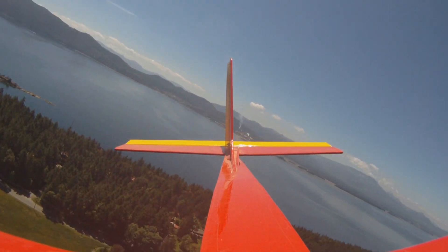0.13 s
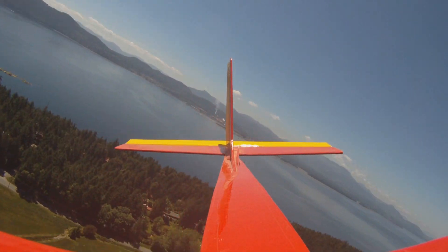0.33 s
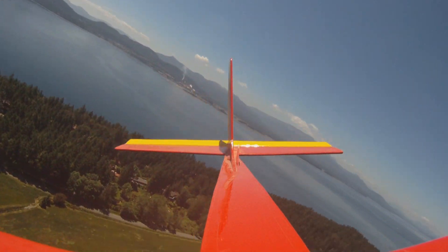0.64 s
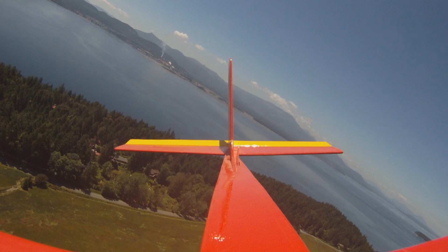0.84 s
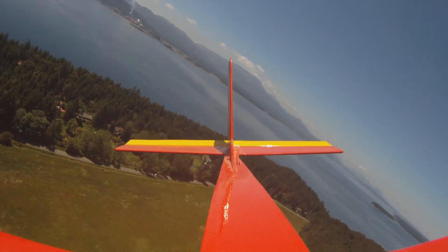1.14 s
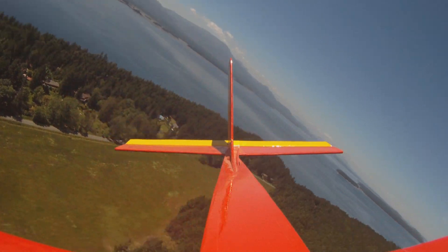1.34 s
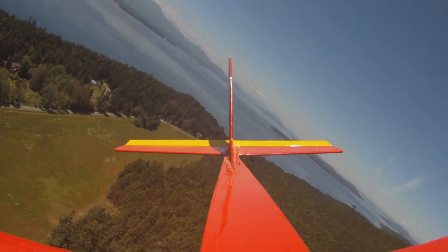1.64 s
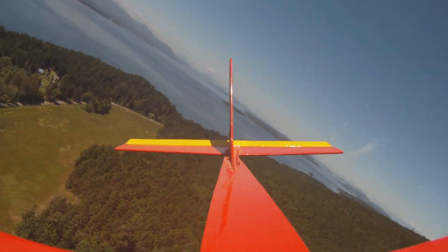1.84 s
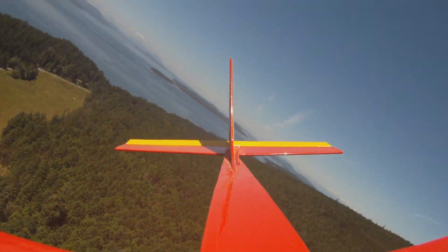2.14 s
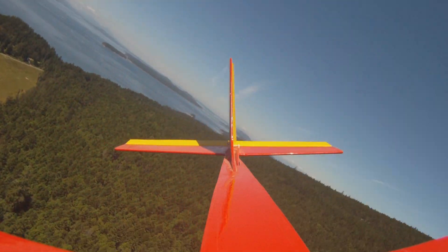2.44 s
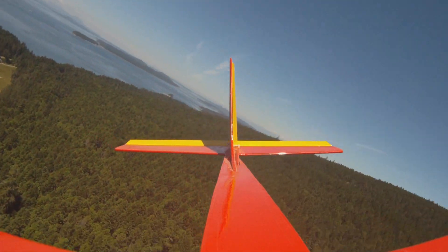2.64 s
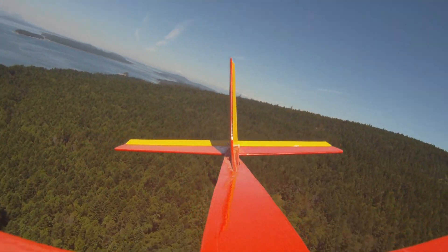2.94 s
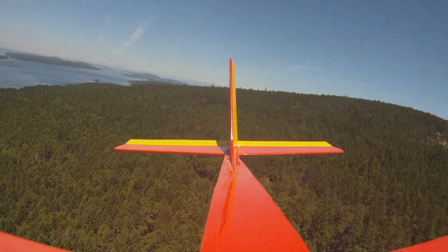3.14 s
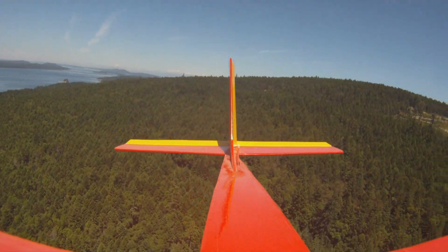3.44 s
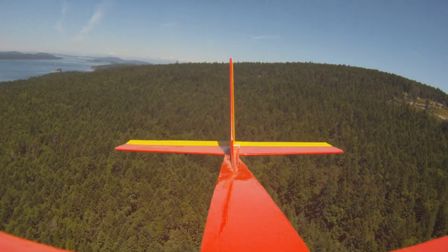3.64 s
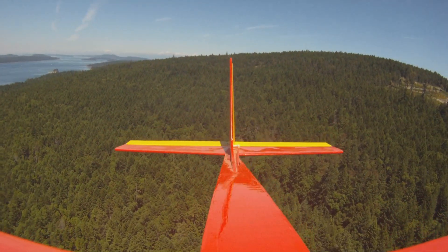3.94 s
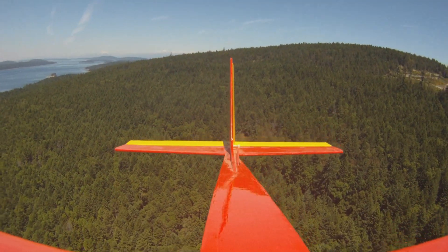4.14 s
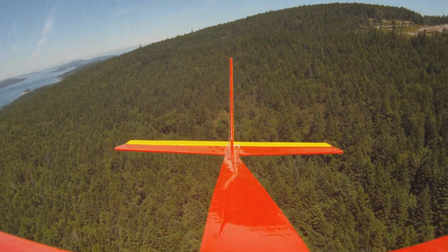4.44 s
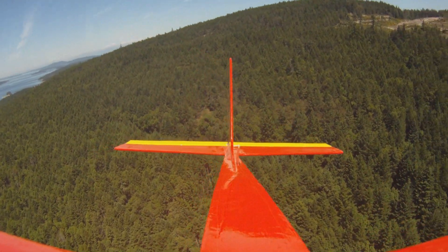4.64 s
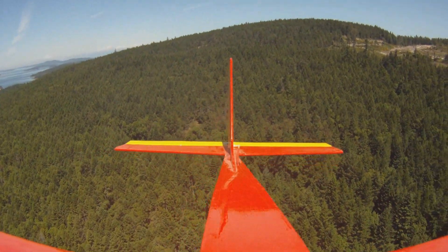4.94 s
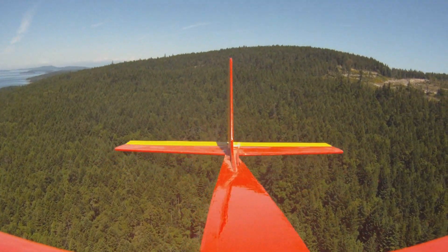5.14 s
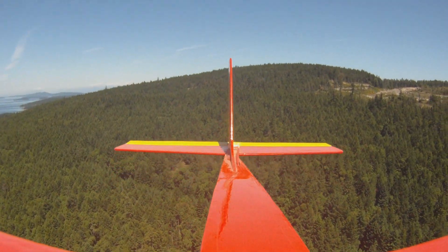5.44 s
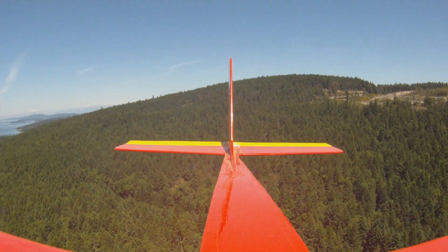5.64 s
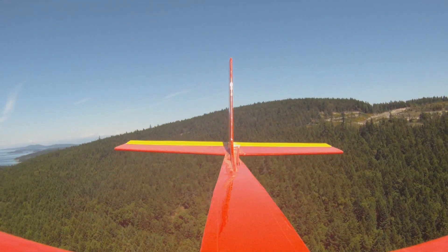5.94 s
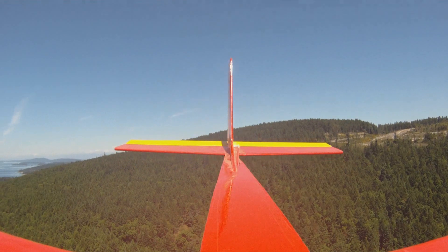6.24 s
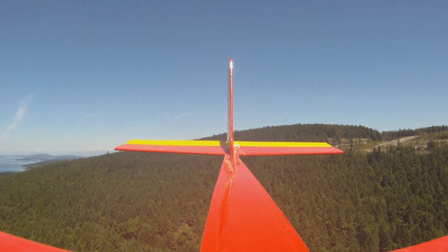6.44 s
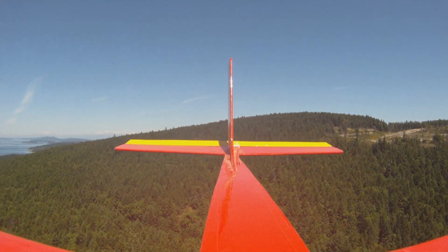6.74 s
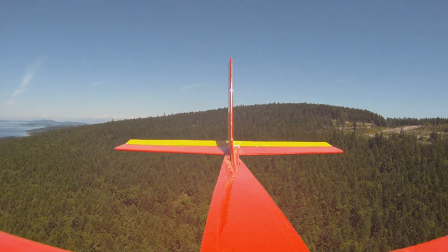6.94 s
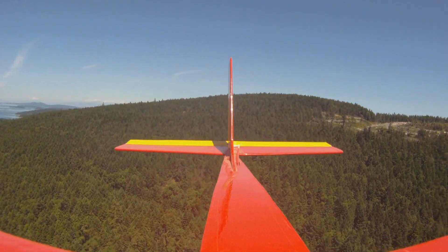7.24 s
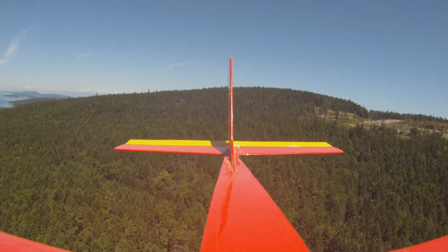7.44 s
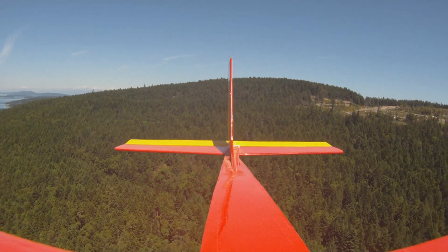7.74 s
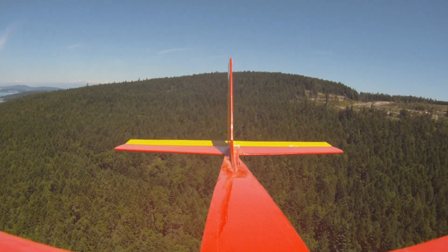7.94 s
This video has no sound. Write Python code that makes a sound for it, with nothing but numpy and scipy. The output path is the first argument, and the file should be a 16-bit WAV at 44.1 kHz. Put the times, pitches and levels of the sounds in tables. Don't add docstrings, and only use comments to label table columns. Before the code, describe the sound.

Wind rumbles low against a microphone on a gliding model aircraft while its small servos buzz, knock and grind in restless short bursts.

```python
import sys
import numpy as np
from scipy import signal
from scipy.io import wavfile

SR = 44100
rng = np.random.default_rng(int(sys.argv[2]) if len(sys.argv) > 2 else 0)


def invert_db(level):
    return 10 ** (np.asarray(level, dtype=float) / 20)


def wav_out(sig):
    wavfile.write(sys.argv[1], SR, np.round(np.clip(np.atleast_2d(sig).T, -1, 1) * 32767).astype(np.int16))


N = 356769
CONTROL_T = np.arange(0, N, 64) / SR


def rms_one(x):
    return x / np.sqrt(np.mean(x ** 2) + 1e-20)


def full_rate(curve):
    return np.interp(np.arange(N) / SR, CONTROL_T, curve)


def in_time(rows):
    s, *columns = np.transpose(rows)
    return [np.interp(np.arange(N) / SR, s, column) for column in columns]


def drift(rate_hz):
    r = np.exp(-2 * np.pi * rate_hz / SR)
    white = rng.standard_normal(N + SR)
    return rms_one(signal.lfilter([1], [1, -2 * r, r * r], white)[SR:])


def decay(x, time_s):
    return signal.lfilter([1], [1, -np.exp(-1 / (time_s * SR))], x)


def bandpass(order, low_hz, high_hz):
    return signal.butter(order, [low_hz, high_hz], "band", fs=SR, output="sos")


def double_resonance(x, hz, width_hz):
    r = np.exp(-np.pi * width_hz / SR)
    top = [(1 - r * r) / 2, 0, (r * r - 1) / 2]
    bottom = [1, -2 * r * np.cos(2 * np.pi * hz / SR), r * r]
    once = signal.lfilter(top, bottom, x + 1e-18)
    return signal.lfilter(top, bottom, once + 1e-18)


def clicks(times, sizes):
    out = np.zeros(N)
    places = np.clip((np.asarray(times) * SR).astype(int), 0, N - 1)
    np.add.at(out, places, sizes)
    return out


def self_noise():
    return invert_db(-72) * rng.standard_normal(N)


# t/s, hiss level/dB, eddy shedding f/Hz
AIR_STREAM = [(0, -53.5, 56), (0.72, -54.5, 54.7), (0.95, -51.5, 64.43), (1.5, -53, 57), (1.8, -54, 62.3),
              (2, -52.5, 57.6), (2.35, -56.5, 70.1), (2.93, -49.5, 68), (3.4, -56.5, 61.9),
              (4.3, -54, 67.44), (4.9, -58, 61.3), (5.05, -60, 46.3), (5.4, -63.5, 46.5),
              (5.65, -58.5, 63.6), (6.1, -61.5, 71.5), (6.6, -58, 53), (7.25, -53.5, 67), (8.09, -56.5, 60)]
# f/Hz, level per Hz/dB
HISS_COLOUR = [(110, -14), (150, 0), (220, -6), (300, -11.5), (450, -16.5), (700, -15.5), (1000, -7.5),
               (1500, -19.5), (2500, -31), (4000, -35), (5900, -53)]
# f/Hz, width/Hz, level against the hiss/dB
HOUSING_MODES = [
    (30.4, 26, 0),
    (87.6, 17, 7),
    (112.3, 30.6, -1.5),
    (175.3, 42, -7.5),
    (196.3, 15.2, -8.5),
    (224.8, 22, -15),
    (257.3, 8.8, -19),
    (349.1, 7.9, -19.5),
    (920, 10, -11),
    (1142, 130, -17),
]


def stream():
    together = drift(4.0)
    edges = 125 * 2 ** np.arange(0, 5.6, .33)
    white = rng.standard_normal((2, N))
    colour_hz, colour_level = np.transpose(HISS_COLOUR)
    hiss = 0
    for k, (low, high) in enumerate(zip(edges, edges[1:])):
        band = signal.sosfilt(bandpass(2, low, high), white[k % 2])
        colour_db = np.interp(np.log(low * high) / 2, np.log(colour_hz), colour_level)
        hiss = hiss + band * invert_db(colour_db + 2.3 * together + 2.2 * drift(13))
    push = rng.standard_normal(N)
    hum = 0
    for k, (hz, width_hz, db) in enumerate(HOUSING_MODES):
        hum = hum + (-1) ** k * invert_db(db) * rms_one(double_resonance(push, hz, width_hz))
    air_db = in_time(AIR_STREAM)[0]
    return invert_db(air_db + 2.0) * (rms_one(hiss) + hum)


# t/s, half length/s, swing level/dB
EDDIES = [(0.356, 0.009, 12), (0.605, 0.017, 10), (0.727, 0.047, 6.5), (0.9, 0.054, -9.5),
          (1.225, 0.11, -4), (1.548, 0.054, 8.5), (1.686, 0.026, -3.5), (1.731, 0.023, 9.5),
          (1.823, 0.011, 8), (2.09, 0.012, 13), (2.152, 0.019, -18), (2.453, 0.18, -3), (2.901, 0.019, 11),
          (2.938, 0.16, -3.8), (3.077, 0.018, 6), (3.173, 0.066, 7), (3.373, 0.011, 12),
          (3.455, 0.016, -12.0), (4.197, 0.013, 3), (4.559, 0.11, 2), (4.77, 0.026, 3), (5.445, 0.1, -1.5),
          (5.717, 0.035, 6.5), (5.942, 0.1, -3.5), (6.181, 0.045, 8), (6.592, 0.024, 6.9),
          (6.988, 0.017, -22), (7.533, 0.047, -12.5), (7.769, 0.02, -13), (7.854, 0.016, -17)]


def eddy_swing():
    swing_db = 0
    for s, half_s, db in EDDIES:
        swing_db = swing_db + db * np.exp(-.5 * ((CONTROL_T - s) / half_s) ** 2)
    return full_rate(swing_db)


def buffet():
    air_db, shedding_hz = in_time(AIR_STREAM)
    level_db = air_db + 19.5 + eddy_swing()
    smooth = signal.butter(2, 23.0, fs=SR, output="sos")
    white = rng.standard_normal(N + SR) + 1j * rng.standard_normal(N + SR)
    wander = signal.sosfilt(smooth, white)[SR:]
    size = rms_one(np.abs(wander)) ** .7
    turning = np.angle(wander) + 2 * np.pi * np.cumsum(shedding_hz) / SR
    swing = invert_db(level_db) * size * np.cos(turning)
    return invert_db(5.0) * signal.sosfiltfilt(bandpass(2, 38, 100), swing)


# t/s, peak level/dB
CREAKS = [(0.1027, -63), (0.154, -59.5), (0.167, -62), (0.4688, -58), (0.5926, -57), (0.9098, -62),
          (0.9532, -59), (0.9732, -64), (0.9877, -63), (1.0111, -61), (1.0221, -56), (1.045, -65),
          (1.1772, -65), (1.2062, -61), (1.2391, -61), (1.2524, -62), (1.265, -53), (1.2895, -61),
          (1.3229, -68), (3.3682, -61), (3.6731, -64), (4.2657, -52)]


def ticks():
    hits = None
    s, peak_db = np.transpose(CREAKS)
    hits = clicks(s, invert_db(peak_db))
    noise = decay(hits, 0.00091) * rng.choice([-1, 1], N)
    creak = 0.45 * noise + 1.95 * hits
    return invert_db(24.5) * double_resonance(creak, 5200, 1800)


# f/Hz, width/Hz, level/dB
AIRFRAME_MODES = [(550, 730, -22), (926.4, 116, -1.5), (1183, 210, -9), (2006, 369, -6),
                  (2335, 198.5, -2.5), (2684, 312, -18), (3300, 220, -32), (3547, 160, -22.5),
                  (3776, 353, -19.5), (3857, 250, -20), (4030, 260, -36), (4930, 940, -42.5)]


def airframe(push, low_db, high_db):
    out = 0
    for k, (hz, width_hz, db) in enumerate(AIRFRAME_MODES):
        drive_db = low_db if hz < 1500 else high_db if hz > 3000 else 0
        out = out + (-1) ** k * invert_db(db + drive_db) * double_resonance(push, hz, width_hz)
    return out


# t/s, peak level/dB
JOLTS = [(0.597, -33), (0.6245, -34.5), (0.6521, -30), (0.6953, -28.5), (0.7751, -33), (0.8101, -26.5),
         (0.8664, -28), (1.0944, -22.5), (1.3857, -32.5), (1.736, -24.5), (2.4628, -29), (2.6485, -30),
         (2.7033, -29), (2.8325, -32.5), (2.8754, -34), (2.9432, -31), (3.1073, -28.5), (4.4004, -25.5),
         (5.0569, -30), (5.1292, -35), (5.1552, -33.5), (5.2689, -43.5), (5.3398, -47), (5.4261, -27.5),
         (5.7219, -32.5), (6.3949, -28), (6.7321, -34), (6.8214, -29.5), (6.8548, -32.5), (7.6066, -21)]


def jolts():
    s, peak_db = np.transpose(JOLTS)
    hits = clicks(s, invert_db(peak_db))
    chatter = decay(hits, 0.0011) * rng.standard_normal(N)
    gain_db = 35.5
    return invert_db(gain_db) * airframe(hits + .1 * chatter, low_db=-9.0, high_db=-6.0)


# start t/s, length/s, depth level/dB
RESTS = [(0.1, 0.03, -2), (0.368, 0.053, -15), (1.492, 0.19, -9.5), (2.429, .02, -19), (3.153, 0.096, -7),
         (3.646, 0.018, -15), (3.915, 0.025, -26), (4.011, 0.1, -33), (4.26, 0.03, -4), (4.357, 0.057, -24),
         (4.537, 0.041, -14), (5.117, 0.023, -24), (5.173, .06, -5.5), (5.235, 0.18, -25),
         (6.015, 0.048, -20), (6.189, .16, -15), (6.702, 0.024, -10), (7.338, .03, -11), (7.621, .02, -12)]


def idling():
    edge_s, drop_db = 0.0038, 0
    for s, length_s, db in RESTS:
        inside_s = np.minimum(CONTROL_T - s, s + length_s - CONTROL_T)
        drop_db = drop_db + db * np.clip(inside_s / edge_s + .5, 0, 1)
    return drop_db


# start t/s, length/s, grinding level/dB
MOVES = [(0.0, 0.081, -41), (0.165, 0.15, -42.5), (0.453, 0.07, -46.3), (0.616, 0.12, -46.5),
         (0.84, 0.071, -41.5), (1.1, 0.055, -44.5), (1.282, 0.011, -47), (1.739, 0.056, -43.5),
         (1.892, 0.04, -73), (2.044, 0.19, -44), (2.292, 0.13, -46), (2.487, 0.12, -43.5),
         (2.695, 0.14, -54), (3.324, 0.027, -50), (3.431, 0.0044, -55.5), (3.583, 0.046, -47.5),
         (3.697, 0.09, -41.5), (3.835, 0.054, -44), (4.094, 0.14, -48), (4.396, 0.11, -48.5),
         (4.631, 0.194, -49.5), (4.848, 0.081, -38), (5.026, 0.14, -51.5), (5.413, 0.12, -50),
         (5.632, 0.06, -53), (6.426, 0.1, -37.5), (6.632, 0.033, -50.5), (6.737, 0.19, -50),
         (7.421, 0.063, -46), (7.534, 0.087, -48.5)]


def arm_travel():
    spin_up, run_down = 428, 345
    power = 0
    for s, length_s, db in MOVES:
        early_s = np.maximum(s - CONTROL_T, 0)
        late_s = np.maximum(CONTROL_T - s - length_s, 0)
        power = power + invert_db(db - spin_up * early_s - run_down * late_s) ** 2
    return power


def servo_work():
    air_db = np.interp(CONTROL_T, *np.transpose(AIR_STREAM)[:2])
    idle_db, travel = idling(), arm_travel()
    load_db = 1.64 * drift(11.45)[::64]
    hold = invert_db(-51 + 0.29 * (air_db + 51) + idle_db + load_db)
    creep_db = -59 + 0.77 * (air_db + 55) + 0.72 * idle_db
    creep = invert_db(creep_db + 1.9 * drift(24.0)[::64])
    knock = np.sqrt(hold ** 2 + invert_db(-8) ** 2 * travel)
    grind = np.sqrt(travel + creep ** 2)
    return full_rate(knock), full_rate(grind)


def pulse_kicks():
    first_s, frame_hz = .0108, 70.18
    pulses = np.arange(first_s, N / SR, 1 / frame_hz)
    luck = np.clip(rng.standard_normal((len(pulses), 2)), -2, 2)
    knocks = clicks(pulses + .0002 * luck[:, 0], invert_db(1.9 * luck[:, 1]))
    rattle = rng.choice([-1, 1], N) * decay(knocks, 0.0019)
    kick = rms_one(airframe(.7 * rms_one(rattle) + rms_one(knocks), low_db=-4.0, high_db=-1.0))
    return kick + invert_db(-2.0) * double_resonance(kick, 2780, 300)


def gear_grind():
    force_db = 6.3 * np.minimum(rng.exponential(1, N), 3)
    meets = rng.random(N) < 6000 / SR
    teeth = rng.choice([-1, 1], N) * invert_db(force_db) * meets
    return rms_one(airframe(teeth * invert_db(1.95 * drift(43)), low_db=-3.5, high_db=3.0))


def servos():
    knock_size, grind_size = servo_work()
    return knock_size * pulse_kicks() + invert_db(1.5) * grind_size * gear_grind()


def scene():
    wind = stream() + buffet()
    machine = ticks() + jolts() + servos()
    return (self_noise() + wind + machine)[None]


def band_limit(x):
    return signal.sosfilt(signal.butter(12, 15460, fs=SR, output="sos"), x)


def record(dry):
    slow = signal.resample_poly(dry, 40, 147, axis=1)
    held = np.repeat(slow, 4, axis=1)
    held = signal.resample_poly(held, 147, 160, axis=1)[:, :N]
    top_cut = signal.cheby2(12, 22, 15480, fs=SR, output="sos")
    return band_limit(signal.sosfiltfilt(top_cut, held))


dry = scene()
out = record(dry)
wav_out(out)
```